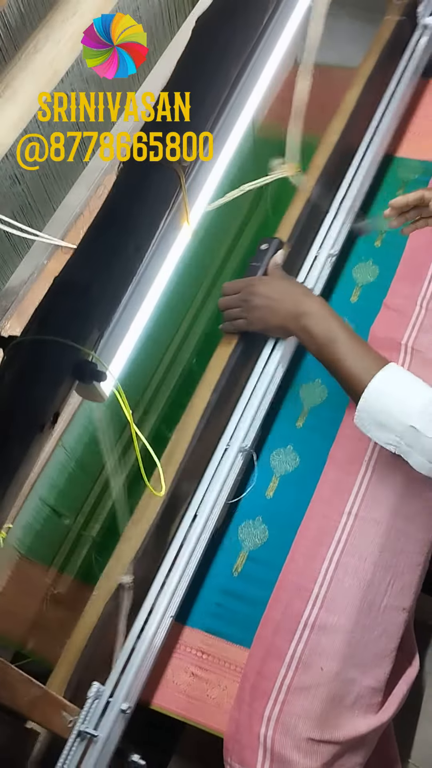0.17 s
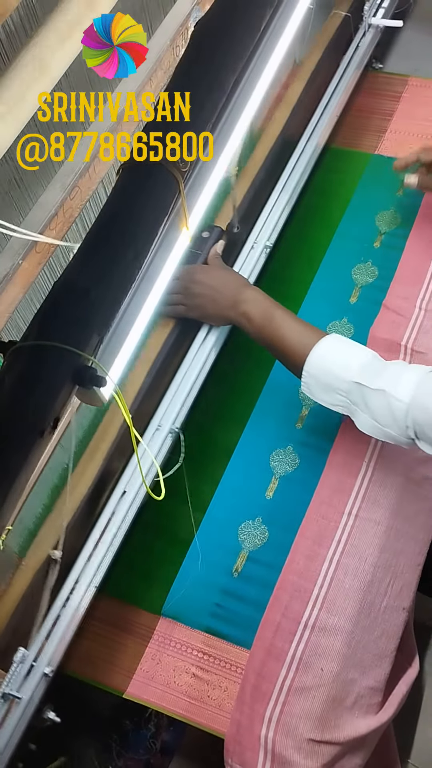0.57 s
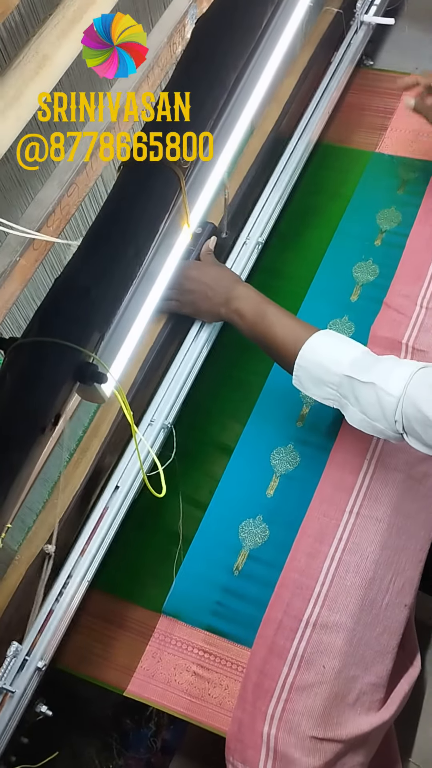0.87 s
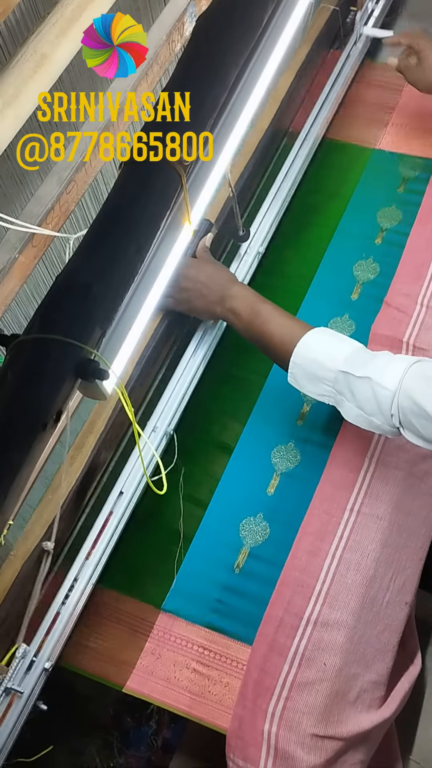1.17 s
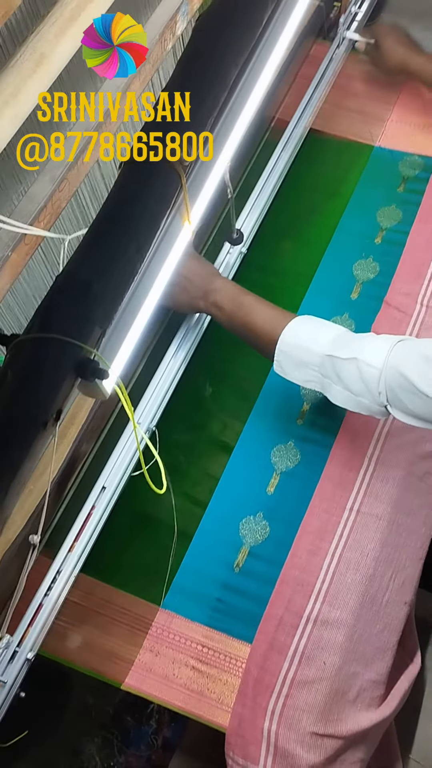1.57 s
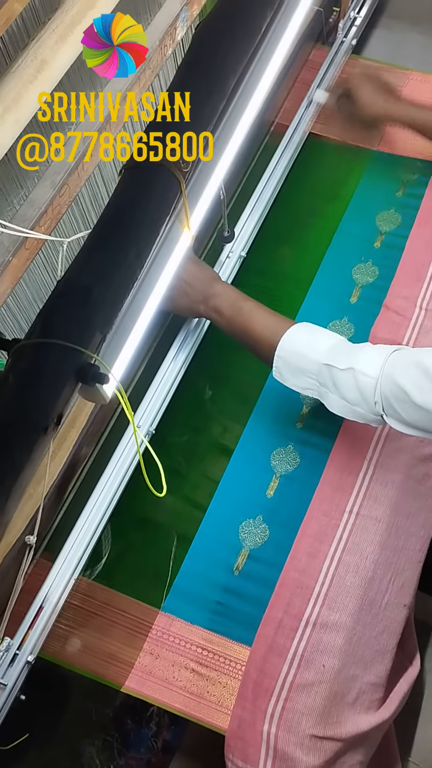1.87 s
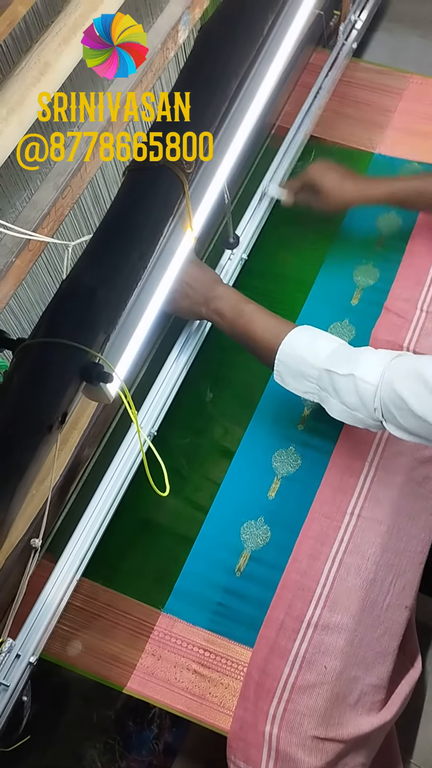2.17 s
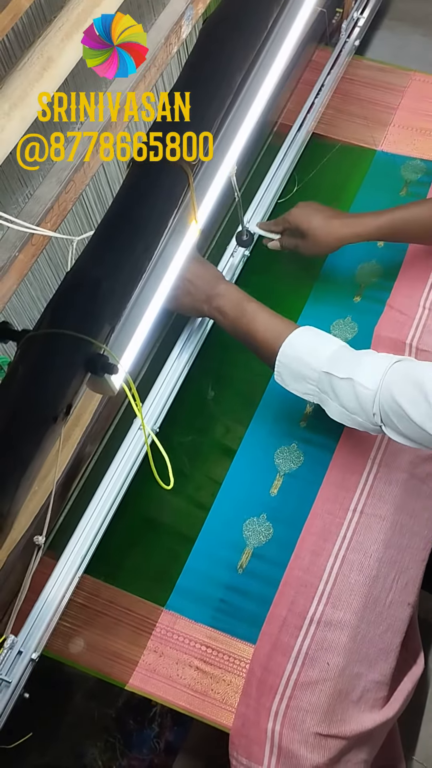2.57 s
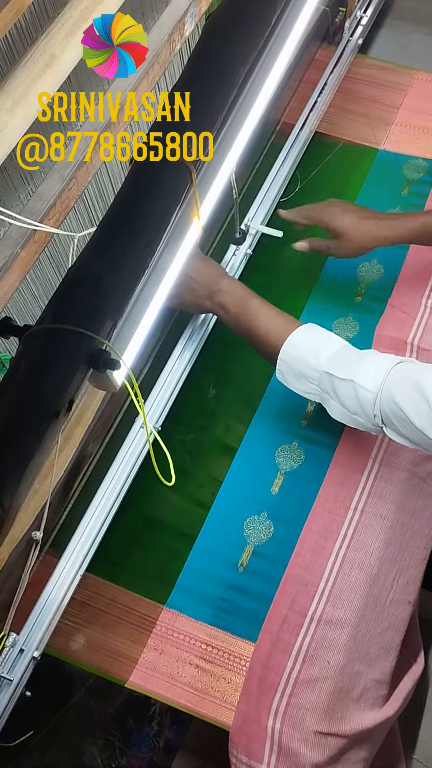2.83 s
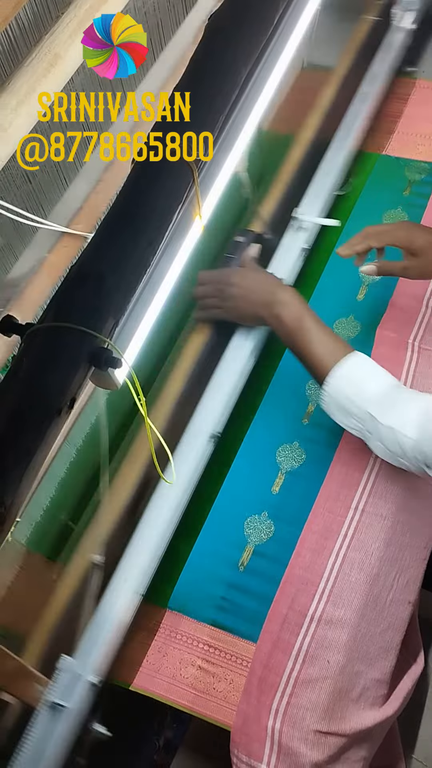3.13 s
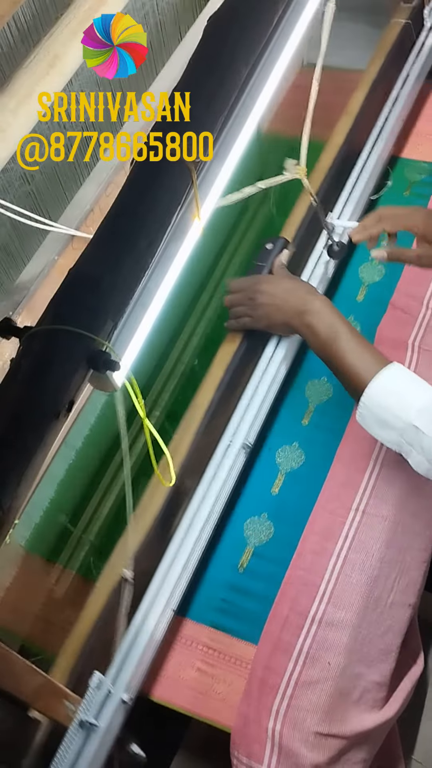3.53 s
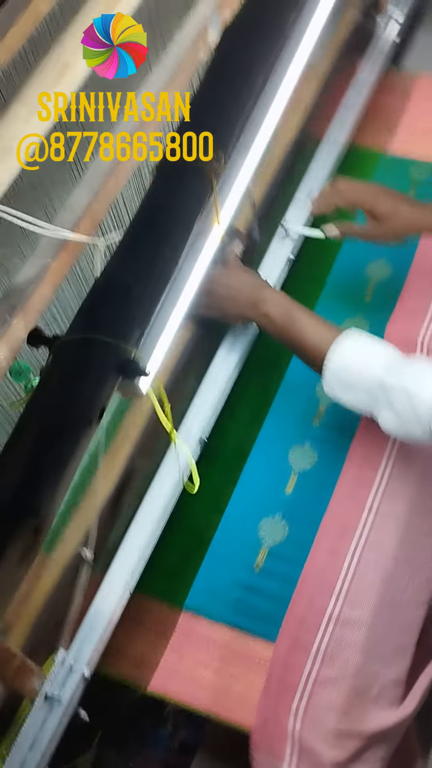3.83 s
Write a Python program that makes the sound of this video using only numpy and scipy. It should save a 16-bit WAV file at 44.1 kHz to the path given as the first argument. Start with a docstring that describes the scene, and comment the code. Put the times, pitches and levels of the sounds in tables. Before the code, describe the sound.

Close stereo microphone above a handloom in a small workshop: beater clatter first, light knocks and spitting air, shuttle whirring along a rail to a hollow tock, air release, heavy lifter slam, beater again.

```python
"""A handloom with an air-driven shed lifter, heard from close above in a small hard-walled room.
Its wooden beater clatters against the cloth: decaying noise bursts excite wood and metal, and the loom thumps.
Enveloped noise makes the valve's puffs and the air's hiss; random grains make the harness rattle.
The shuttle rolls along its rail as grains through resonances, and is caught with a hollow tock.
The air is let out, the lifter slams down with ringing modes, and the beater strikes again."""
import sys
import numpy as np
from scipy import signal
from scipy.fft import rfft, irfft
from scipy.io import wavfile

SR = 44100
rng = np.random.default_rng(int(sys.argv[2]) if len(sys.argv) > 2 else 0)


def transcribe(signal):
    """Save signal, clipped to [-1, 1], as a 16-bit WAV file at the path in sys.argv[1]."""
    frames = np.atleast_2d(signal).T
    limited = np.clip(frames, -1, 1)
    pcm = np.round(limited * 32767).astype(np.int16)
    wavfile.write(sys.argv[1], SR, pcm)


N = 176400
T = np.arange(N) / SR
HZ = np.fft.rfftfreq(N, 1 / SR)


def amp(db):
    """Level definition: decibels to amplitude gain."""
    return 10 ** (np.asarray(db) / 20)


def unit(x):
    """Normalisation: scales a signal to rms 1."""
    return x / np.sqrt(np.mean(x ** 2) + 1e-20)


def read(points, hz):
    """Logarithmic frequency scale: interpolates a table along it."""
    f, value = np.transpose(points)
    return np.interp(np.log(hz + 1), np.log(f + 1), value)


def colour(x, points):
    """Minimum-phase filtering: imposes a spectrum causally; white noise keeps its power."""
    gain = unit(amp(read(points, abs(np.fft.fftfreq(4096, 1 / SR)))))
    # the Hilbert transform of the log gain supplies the minimum phase
    spectrum = np.exp(np.conj(signal.hilbert(np.log(gain))))
    taps = np.fft.ifft(spectrum).real
    return signal.oaconvolve(x, taps[:len(taps) // 2])[:N]


def ring(x, hz, width_hz):
    """Resonance: one steep damped response; white noise keeps its power."""
    t = T[:SR // 4]
    tone = t * np.exp(-np.pi * abs(width_hz) * t) * np.sin(2 * np.pi * hz * t)
    return signal.oaconvolve(x, tone / np.linalg.norm(tone))[:len(x)]


def resonant_body(drive, spectrum, modes):
    """Modal superposition: a broad response plus a few resonances."""
    resonances = sum(amp(db) * ring(drive, hz, width) for hz, width, db in modes)
    return colour(drive, spectrum) + resonances


def chime(rows, modes, lag_s):
    """Free vibration: damped modes start at each contact, with a phase lag on the right."""
    out, t = np.zeros((2, N)), T[:2 * SR]
    for port, lag in zip(out, (0, lag_s)):
        tone = sum(amp(db - 60 * t / t60) * np.sin(2 * np.pi * hz * (t - lag)) for hz, db, t60 in modes)
        for s, db in rows:
            add(port, s, amp(db) * tone)
    return out


def add(mix, s, sound):
    """Superposition: adds a sound to the mix at time s."""
    part = mix[max(round(s * SR), 0):][:len(sound)]
    part += sound[:len(part)]


def wander(step_s, db):
    """Random modulation: a gain drifts between new values, one every step_s."""
    steps = rng.standard_normal(8000)
    return unit(amp(db * np.interp(T / step_s, np.arange(len(steps)), steps)))


CRUNCH_S, CRUNCH_DB = 0.001403, 2.5  # chatter of a contact: time between gain values, and their spread


def burst(db, t60):
    """Impact excitation: the exponentially dying, chattering crunch of one contact."""
    t = T[:SR // 2]
    steps = rng.standard_normal(2000)
    chatter = unit(amp(CRUNCH_DB * np.interp(t / CRUNCH_S, np.arange(len(steps)), steps)))
    return amp(db - 60 * t / t60) * chatter * rng.standard_normal(len(t))


def strikes(rows, t60):
    """Superposed impacts: a track of contacts from rows of start_s, level_db."""
    out = np.zeros(N)
    for s, db in rows:
        add(out, s, burst(db, t60))
    return out


def swells(rows):
    """Power summation: envelopes that rise, hold and fall exponentially."""
    power = np.zeros(N)
    for s, db, rise, hold, fall in rows:
        onset = np.clip((T - s) / rise, 0, 1)
        decay = amp(db - fall * np.maximum(T - s - rise - hold, 0))
        power += (onset * decay) ** 2
    return np.sqrt(power)


def grains(per_s, spread_db):
    """Random impulse train: tiny clicks of uneven size at a mean rate."""
    clicks = (rng.random(N) < per_s / SR) * rng.standard_normal(N)
    return unit(clicks * amp(spread_db * np.minimum(rng.exponential(1, N), 3)))


# left-right likeness of a diffuse sound: frequency_hz, likeness (0 to 1)
LIKENESS = [(20, 0.81), (60, 0.98), (130, 0.97), (260, 0.91), (500, 0.51), (1000, 0), (16000, 0.02)]


def pair(a, b):
    """Interchannel coherence: two unrelated sounds become a stereo pair, most alike in the bass."""
    same = np.clip(read(LIKENESS, HZ), -1, 1)
    mid = rfft(a) * np.sqrt((1 + same) / 2)
    side = rfft(b) * np.sqrt((1 - same) / 2)
    return irfft([mid + side, mid - side], N)


# decay time of the room: frequency_hz, t60_s
ROOM_DECAY = [(100, 1), (500, 0.67), (1400, 0.52), (3700, 0.38), (7000, 0.37), (14000, 0.31)]
ROOM_GAP_S = 0.0023  # silence before the first reflections


def room(x, wet_db, pan_db, lag_ms):
    """Reverberation: direct sound, later on the right, plus dense reflections dying faster in the treble."""
    hz, t, z = signal.stft(rng.standard_normal((2, SR)), SR, nperseg=256)
    t60 = read(ROOM_DECAY, hz)[:, None]
    unit_energy = np.sqrt(2 * np.log(1000) / t60 / SR)
    tail = signal.istft(z * amp(-60 * t / t60) * unit_energy, SR, nperseg=256)[1]
    tail = np.pad(tail, ((0, 0), (0, N - tail.shape[1])))
    tail = pair(*tail)[:, :SR] * (T[:SR] > ROOM_GAP_S)
    left = x * amp(pan_db / 2)
    right = np.interp(T - lag_ms / 1000, T, x) * amp(-pan_db / 2)
    return np.array([left, right]) + amp(wet_db) * signal.fftconvolve(x[None], tail, axes=1)[:, :N]


# spectrum of the workshop rumble: frequency_hz, level_db
FLOOR_SPECTRUM = [(12, -38), (20, -1), (37, -11.5), (58, -2), (81, -9), (150, -14), (172, -12),
                  (241, -21.5), (310, -17.5), (367, -22.5), (8650, -53), (16000, -58)]
FLOOR_DB = -37.5


def floor():
    """Stationary noise: the low steady rumble of the workshop."""
    noise = pair(*rng.standard_normal((2, N)))
    rumble = irfft(rfft(noise) * amp(read(FLOOR_SPECTRUM, HZ)), N)
    return amp(FLOOR_DB) * unit(rumble)


# gusts of exhaust air that reach the microphone: start_s, level_db
GUSTS = [(1.095, -5.5), (3.091, -2.5), (3.786, -5.5)]
GUST_SCALE_S, GUST_LOW_HZ = 0.014, 3  # each push peaks after twice this time; high-pass corner


def gusts():
    """Aerodynamic pressure: a slow swing, nearly all on the left port."""
    push = np.zeros(N)
    u = T[:SR] / GUST_SCALE_S
    for s, db in GUSTS:
        add(push, s, -amp(db) * (u * np.exp(1 - u / 2) / 2) ** 2)
    swing = signal.sosfilt(signal.butter(2, GUST_LOW_HZ, "high", fs=SR, output="sos"), push)
    return np.array([swing, swing * amp(-26.0)])


# spectrum of small metal contacts: frequency_hz, level_db
METAL_SPECTRUM = [(300, -20), (1500, -6), (3000, 3.5), (6500, 3.5), (10000, 2), (15500, -5)]
METAL_T60_S = 0.034


def metal_clicks(rows):
    """Strongly damped impact: short bursts coloured as metal."""
    return colour(strikes(rows, METAL_T60_S), METAL_SPECTRUM)


# light knocks of shuttle, cords and frame: start_s, level_db, pitch_hz, tick_level_db
KNOCKS = [(.338, -28, 2180, -58), (.494, -35, 1260, -77), (.518, -30.5, 1330, -48),
          (.600, -39, 2120, -46.5), (1.024, -40, 1240, -43), (1.051, -42, 1210, -62),
          (1.080, -29, 940, -29.5), (1.240, -30, 1270, -20), (1.357, -27, 1760, -30),
          (1.379, -24, 1460, -19), (1.702, -42, 4470, -49), (1.755, -29, 2460, -43),
          (2.571, -36.5, 1250, -43), (2.608, -41.5, 4900, -53), (2.758, -44, 4150, -54),
          (2.786, -34, 1410, -48), (3.047, -35, 1210, -36), (3.081, -27, 1150, -40),
          (3.627, -28.5, 1330, -35.5), (3.718, -34.5, 4470, -44), (3.763, -28, 1520, -36),
          (3.925, -29.5, 655, -23), (3.937, -35, 1880, -38)]
# spectrum of the wood behind each knock: frequency_hz, level_db
KNOCK_WOOD = [(100, -38), (400, 1), (700, 1.5), (1500, -4), (2800, -4.5), (4000, -11.5), (8000, -24),
              (16000, -34)]
KNOCK_T60_S, KNOCK_Q, KNOCK_WOOD_DB = 0.026, 2.6, 0.5  # wood level is relative to the knock


def knocks():
    """Impact on a damped resonator: one short ring, a little wood and a metal tick."""
    rings = np.zeros(N)
    for s, db, hz, _ in KNOCKS:
        add(rings, s, ring(burst(db, KNOCK_T60_S), hz, hz / KNOCK_Q))
    wood = strikes([(s, db + KNOCK_WOOD_DB) for s, db, _, _ in KNOCKS], KNOCK_T60_S)
    ticks = metal_clicks([(s, tick_db) for s, _, _, tick_db in KNOCKS])
    return room(rings + colour(wood, KNOCK_WOOD) + ticks, wet_db=3.0, pan_db=6.5, lag_ms=0.11)


# sharp puffs of the valve: start_s, level_db, rise_s, hold_s, fall_db_per_s
PUFFS = [(1.093, -16.5, 0.0057, 0.0083, 385), (1.195, -26, .003, .003, 600),
         (1.283, -22, 0.0017, 0.002, 600), (1.378, -17, 0.0011, 0.0011, 800),
         (1.463, -28, 0.0021, 0.003, 902), (1.48, -36.5, 0.019, 0.026, 257),
         (2.805, -22.5, 0.0034, 0.023, 250), (3.040, -22.5, 0.0022, 0.0032, 720),
         (3.088, -17, 0.0091, .004, 400), (3.783, -18, 0.0026, 0.015, 329)]
# spectrum of a puff: frequency_hz, level_db
PUFF_SPECTRUM = [(200, -3), (1000, -11.5), (2500, -7.5), (4000, -3.5), (7000, -1), (10000, -1),
                 (13500, 3.5), (15500, -1.5)]


def valve_puffs():
    """Jet noise: coloured turbulence in short bursts."""
    puffs = colour(rng.standard_normal(N), PUFF_SPECTRUM) * swells(PUFFS)
    return room(puffs, wet_db=2.5, pan_db=-1.0, lag_ms=0.296)


# air streaming through the cylinder ports: start_s, level_db, rise_s, hold_s, fall_db_per_s
HISSES = [(1.18, -31.5, 0.012, 0.064, 209), (1.275, -35, 0.005, 0.0026, 500),
          (1.355, -28.5, 0.0027, 0.032, 300), (1.379, -27.5, 0.0026, 0.09, 222),
          (2.757, -47, 0.0032, 0.042, 293), (2.805, -27.5, 0.0022, 0.076, 45),
          (3.0, -26.5, 0.06, 0.15, 166), (3.86, -28.5, 0.013, 0.07, 148)]
# spectrum of the hiss: frequency_hz, level_db
HISS_SPECTRUM = [(150, 2.5), (500, -5.5), (1000, -6), (2000, -1), (3500, -0.5), (6500, -3), (10000, -3.5),
                 (13500, -4), (16000, -3.5)]


def cylinder_hiss():
    """Flow noise: smooth turbulence roughened by random grains."""
    flow = rng.standard_normal(N) + amp(-7.0) * grains(per_s=2600, spread_db=5.5)
    hiss = colour(flow, HISS_SPECTRUM) * swells(HISSES)
    return room(hiss, wet_db=3.5, pan_db=1.0, lag_ms=0.18)


# the harness rattles as it rises and falls: start_s, level_db, rise_s, hold_s, fall_db_per_s
RATTLES = [(.0, -39.5, 0.058, 0.086, 51), (1.17, -36, 0.028, 0.091, 106), (1.35, -30.5, 0.017, 0.093, 135),
           (2.9, -38, 0.22, 0.13, 103), (3.18, -32.5, 0.0096, 0.037, 43), (3.87, -34, 0.045, 0.11, 100)]
# spectrum of the rattle: frequency_hz, level_db
RATTLE_SPECTRUM = [(50, -7.5), (110, 0), (180, 3), (290, -1.5), (420, -6), (700, -10), (1400, -13),
                   (3000, -17), (8000, -25), (16000, -34)]


def harness_rattle():
    """Random multiple impacts: cords and weights jostle against the frame."""
    rattle = colour(grains(per_s=1500, spread_db=4), RATTLE_SPECTRUM) * swells(RATTLES)
    return room(rattle, wet_db=-0.5, pan_db=2.5, lag_ms=0.074)


# a small metal part of the harness pings: start_s, level_db
PINGS = [(1.49, -36), (1.625, -53)]
# its modes: pitch_hz, level_db, t60_s
PING_MODES = [(9550, -14, .25), (10909, -8, .25), (12613, 12, 0.32), (14000, -9, .22)]


def harness_pings():
    """Free modal decay: the metal part rings in the high treble."""
    return chime(PINGS, PING_MODES, lag_s=.00001)


# weft thread drawn off the bobbin, one row: start_s, level_db, rise_s, hold_s, fall_db_per_s
THREAD = (1.8, -54, .15, .69, 250)
# spectrum of the thread: frequency_hz, level_db
THREAD_SPECTRUM = [(1000, -18), (2800, -3), (4300, 6), (5100, 5.5), (5950, 13.5), (7200, -9.5),
                   (15000, -12)]


def thread():
    """Friction noise: the thread pays out as a dense train of fine grains."""
    return colour(grains(per_s=1100, spread_db=0.5), THREAD_SPECTRUM) * swells([THREAD])


def along_rail(x, places_s):
    """Moving source: crossfades through places at the given times, each with its own reflections."""
    out = 0
    for here in np.eye(len(places_s)):
        share = np.sqrt(np.interp(T, places_s, here))
        out = out + room(x * share, wet_db=4.0, pan_db=3.0, lag_ms=0.063)
    return out


# level of the shuttle rolling along the rail: time_s, level_db
ROLL = [(1.70, -51), (1.77, -38), (1.82, -31.5), (1.92, -30.5), (2.03, -32), (2.15, -34.5), (2.27, -36),
        (2.35, -48.5), (2.5, -54.5), (2.62, -56), (2.66, -87)]
# broad spectrum of the rail: frequency_hz, level_db
RAIL_SPECTRUM = [(200, -16), (450, -12), (650, 3), (900, -6.5), (1250, 1), (1600, 3), (2100, -2.5),
                 (2500, -3.5), (3500, -8), (6000, -14), (8500, -19), (15000, -26)]
# resonances of the rail: pitch_hz, width_hz, level_db
RAIL_MODES = [(684, 50, -18.5), (1195, 100, -21), (1317, 240, -7.5), (1452, 220, -6), (1836, 70, -11),
              (2420, 300, -14.5), (2800, 250, -14.5), (5970, 500, -21)]
WHEEL_HZ, WHEEL_DEPTH = 26, 0.12  # rate and fractional depth of the roller modulation
BUMP_S, BUMP_DB = .007, -0.5  # unevenness of the rail
DRIFT_S, DRIFT_DB = .045, 1  # slower drift of each resonance


def shuttle():
    """Rolling excitation: rollers chatter over the uneven rail and thread pays out."""
    drive = grains(per_s=1300, spread_db=2) * (1 + WHEEL_DEPTH * np.sin(2 * np.pi * WHEEL_HZ * T))
    level_db = np.interp(T, *np.transpose(ROLL), left=-120, right=-120)
    drive = drive * wander(BUMP_S, BUMP_DB) * amp(level_db)
    rail = colour(drive, RAIL_SPECTRUM)
    for hz, width, db in RAIL_MODES:
        rail = rail + amp(db) * ring(drive * wander(DRIFT_S, DRIFT_DB), hz, width)
    places_s = np.linspace(ROLL[1][0], ROLL[-4][0], 5)
    return along_rail(amp(-3.5) * rail + thread(), places_s)


CATCH_S, CATCH_DB, HOLLOW_HZ, HOLLOW_T60_S = 2.571, -29.5, 633, 0.097


def shuttle_catch():
    """Single-mode resonance: the hollow shuttle tocks as it is stopped."""
    return chime([(CATCH_S, CATCH_DB)], [(HOLLOW_HZ, 0, HOLLOW_T60_S)], lag_s=0)


# the lifter lands on its stop and settles: start_s, level_db
SLAMS = [(3.130, -13), (3.147, -11), (3.168, -37)]
# broad spectrum of the slam: frequency_hz, level_db
SLAM_SPECTRUM = [(60, 4), (200, -6), (400, 0), (680, 7.5), (1000, -3), (1500, 5.5), (2200, -1.5),
                 (2850, -19), (3400, -18), (7000, -10.5), (16000, -10)]
# ringing of the lifter's frame: pitch_hz, level_db, t60_s
SLAM_MODES = [(114.7, -5.5, 1.95), (677, 2.5, 0.43), (930, -4, 0.62), (1490, -7, 0.23), (1745, -6, 0.7),
              (2076, -5, 0.21), (2295, -16, 0.38), (2700, -17, 0.29), (2780, -4, 0.18), (4150, -4, 0.2),
              (4260, -3, .26)]
SLAM_T60_S, SLAM_MODES_DB = 0.06, -9.5  # ringing level is relative to the first slam
SLAM_LAG_S = 0.00041  # phase lag of the ringing on the right port
CRACK_DB, CRACK_HZ, CRACK_WIDTH_HZ, CRACK_T60_S = -12.5, 2750, 1100, 0.023  # first contact


def lifter():
    """Impact and modal decay: the lifter slams down with a hard crack and its frame rings."""
    s, db = SLAMS[0]
    crack = ring(strikes([(s, CRACK_DB)], CRACK_T60_S), CRACK_HZ, CRACK_WIDTH_HZ)
    crash = colour(strikes(SLAMS, SLAM_T60_S), SLAM_SPECTRUM)
    ringing = chime([(s, db + SLAM_MODES_DB)], SLAM_MODES, SLAM_LAG_S)
    return room(crash + crack, wet_db=4.5, pan_db=-2.0, lag_ms=0.04) + ringing


# the beater presses the weft home and shakes the loom: start_s, level_db, rise_s, hold_s, fall_db_per_s
THUMPS = [(.10, -21.5, 0.017, 0.0075, 170), (3.385, -27, 0.0071, 0.019, 110)]
# spectrum of the thump: frequency_hz, level_db
THUMP_SPECTRUM = [(15, -32), (35, 9), (75, 6), (130, 0), (200, -2.5), (400, -17), (2000, -51)]


def loom_thump():
    """Low-frequency structural response: the whole loom thumps, equally on both sides."""
    return colour(rng.standard_normal(N), THUMP_SPECTRUM) * swells(THUMPS)


# blows of the beater and its loose fittings: start_s, wood_level_db, metal_level_db
BEATS = [(.0, -28, -42), (.094, -19, -43), (0.1021, -15.5, -24.5), (.109, -19.5, -26), (0.119, -25.5, -23),
         (.143, -15.5, -45), (.154, -20.5, -24), (.176, -17.5, -24), (.182, -19, -36), (0.228, -24, -51),
         (3.373, -17.5, -44), (3.382, -18.5, -24.5), (3.391, -23, -24), (3.409, -16, -26),
         (3.429, -18.5, -24), (3.459, -25.5, -22), (3.497, -24.5, -32)]
# broad spectrum of the wood: frequency_hz, level_db
WOOD_SPECTRUM = [(60, -14), (150, -3), (330, -6), (700, 3.5), (1400, 3), (2000, -2.5), (2700, 1),
                 (4000, -7.5), (6500, -10.5), (9000, -24.5), (16000, -21)]
# resonances of the wooden frame: pitch_hz, width_hz, level_db
FRAME_MODES = [(570, 104, -22.5), (735, 180, -16.5), (822, 220, -30), (1430, 280, -22), (2510, 170, -17.5)]
WOOD_T60_S = 0.08


def beater():
    """Impact excitation of a body: each blow knocks the wooden frame and clicks its metal fittings."""
    blows = strikes([(s, wood_db) for s, wood_db, _ in BEATS], WOOD_T60_S)
    wood = resonant_body(blows, WOOD_SPECTRUM, FRAME_MODES)
    metal = metal_clicks([(s, metal_db) for s, _, metal_db in BEATS])
    wood_heard = amp(-1.3) * room(wood, wet_db=3.5, pan_db=0.5, lag_ms=0.11)
    return wood_heard + room(metal, wet_db=6.0, pan_db=21, lag_ms=0.25)


def scene():
    """Linear superposition: the loom in its room, from background to beater."""
    background = floor() + gusts() + knocks()
    air = valve_puffs() + cylinder_hiss()
    harness = harness_rattle() + harness_pings()
    return background + air + harness + shuttle() + shuttle_catch() + lifter() + loom_thump() + beater()


# response shared by the microphone ports: frequency_hz, level_db
MIC_RESPONSE = [(5000, -0.5), (7000, -3), (8300, -9), (9600, -5), (11000, -9.5), (12700, -1), (16000, -1.5)]
# left minus right response: frequency_hz, difference_db
PORT_BALANCE = [(30, -2.5), (100, 2), (500, -1.5), (2000, 0.4), (4500, -0.5), (8000, -2.5), (13000, 3)]
EDGE_HZ = 16000  # upper band limit


def record(dry):
    """Linear transducer response: the colour of the two microphone ports, then the band limit."""
    hz = np.fft.rfftfreq(2 * N, 1 / SR)
    ports = amp(read(MIC_RESPONSE, hz) + np.array([[.5], [-.5]]) * read(PORT_BALANCE, hz))
    heard = irfft(rfft(dry, 2 * N) * ports)[:, :N]
    low_pass = signal.firwin(511, EDGE_HZ, window=("kaiser", 9), fs=SR)
    return signal.oaconvolve(heard, low_pass[None], "same")


dry = scene()
out = record(dry)
transcribe(out)
```